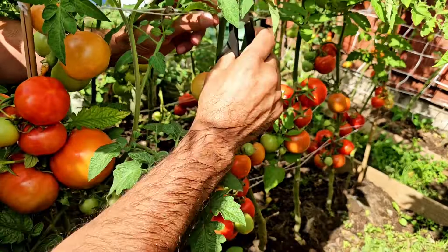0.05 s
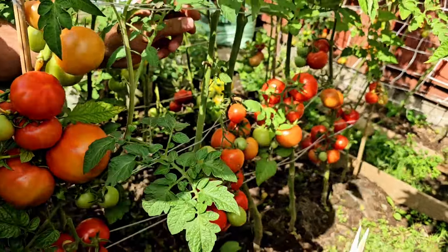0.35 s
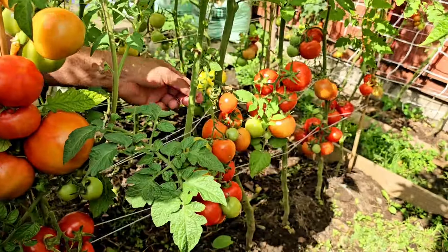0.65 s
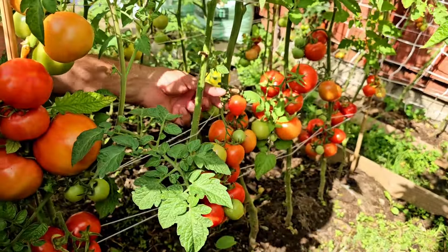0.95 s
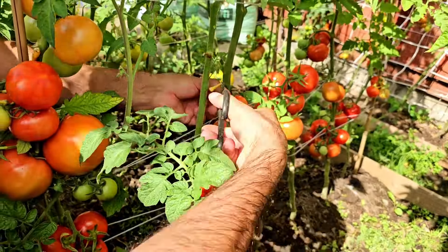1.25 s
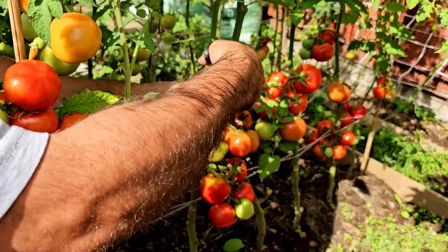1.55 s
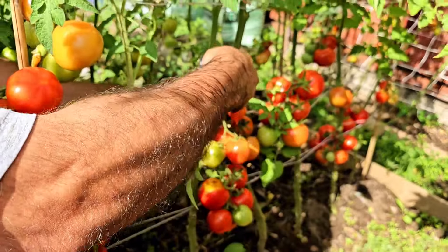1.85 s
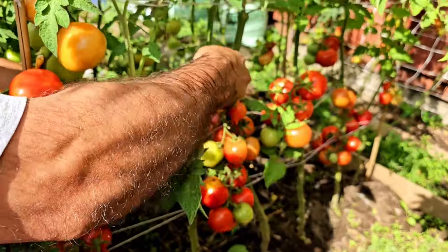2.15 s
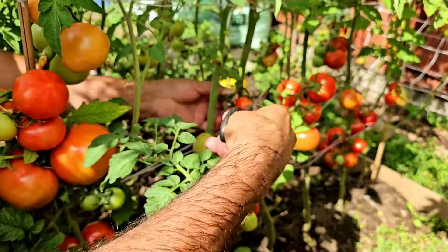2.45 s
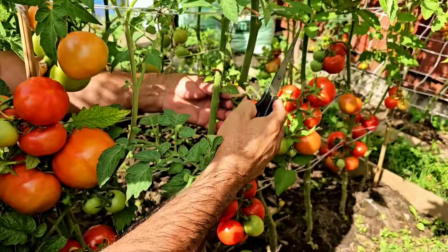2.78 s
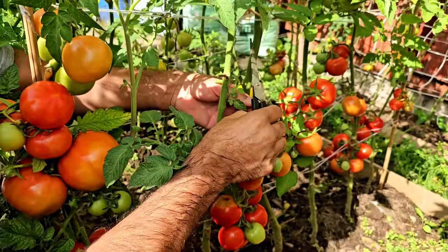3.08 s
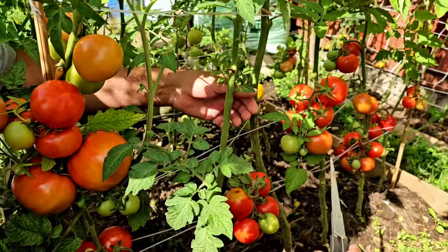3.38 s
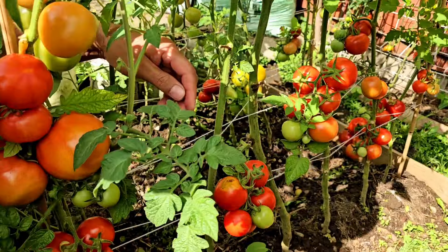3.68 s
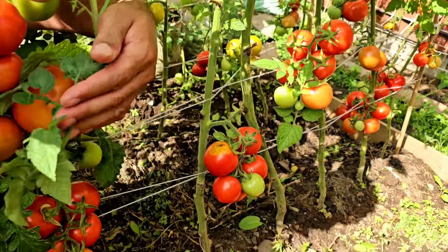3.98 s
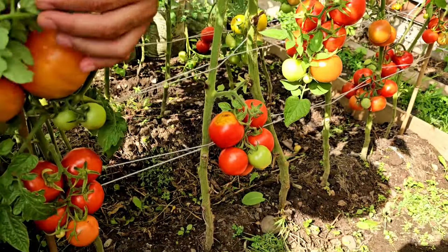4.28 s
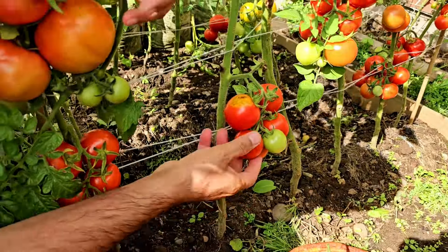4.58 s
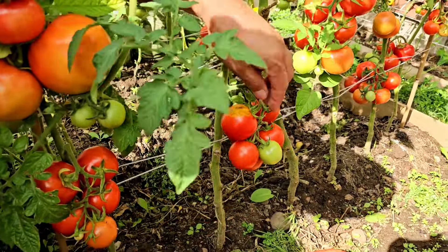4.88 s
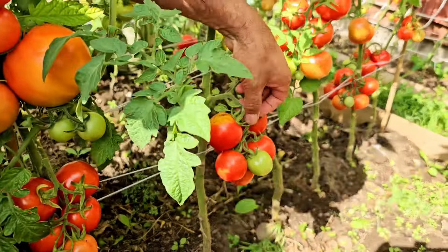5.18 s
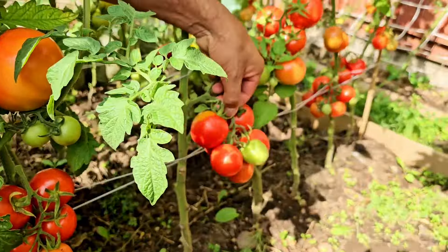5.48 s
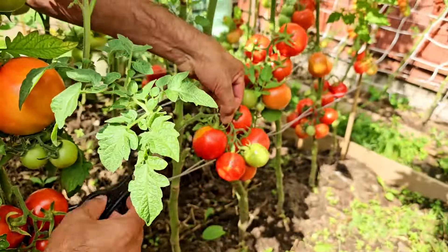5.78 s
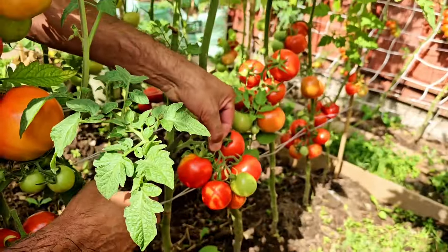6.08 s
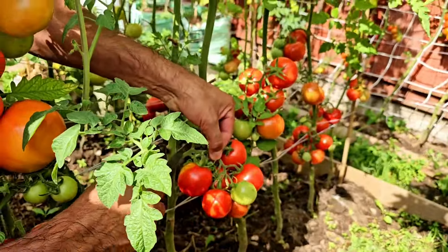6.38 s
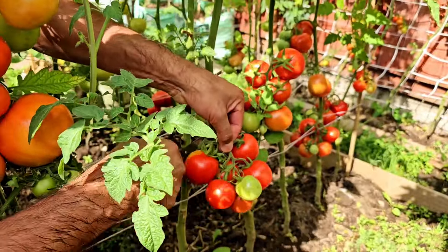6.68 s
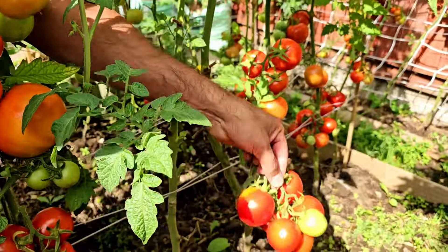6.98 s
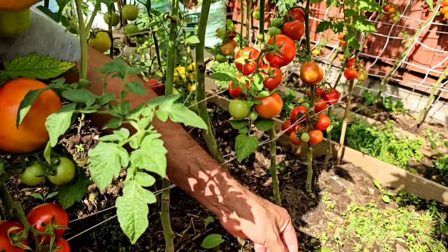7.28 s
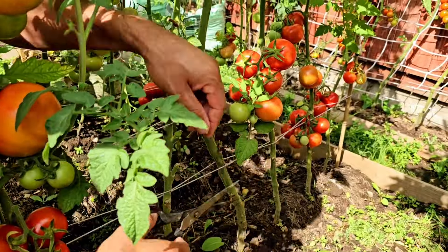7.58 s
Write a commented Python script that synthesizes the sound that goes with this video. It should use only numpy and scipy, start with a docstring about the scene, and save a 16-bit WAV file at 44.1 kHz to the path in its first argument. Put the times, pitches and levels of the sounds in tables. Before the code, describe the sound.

A low, uneven hum in a garden while hands bump and rustle tomato plants and scissors snap shut a few times.

```python
"""A garden: tomatoes are trimmed with scissors, close to two microphone ports.
A low hum swells and wavers over the soft outdoor rumble. Leaves brush the arms, their hairs
catching and slipping; hand and fruit bump the stalks, which crackle as fibres break.
Now and then the steel blades snap shut on a stem and ring."""
import sys
import numpy as np
from scipy import signal
from scipy.fft import rfft, irfft, next_fast_len
from scipy.io import wavfile
from scipy.ndimage import uniform_filter1d, map_coordinates

SR = 44100
rng = np.random.default_rng(int(sys.argv[2]) if len(sys.argv) > 2 else 0)


def materialize(psi):
    """Save the field psi as 16-bit PCM at rate SR to the path in sys.argv[1].

    A 1-D psi becomes a single channel; in a 2-D psi each row is a channel.
    """
    bounded = np.clip(np.atleast_2d(psi).T, -1, 1)
    quanta = np.round(bounded * 32767).astype(np.int16)
    wavfile.write(sys.argv[1], SR, quanta)


N = 345739

# Table levels are relative; each source adds its own gain.
# outdoor rumble spectrum: f/Hz, level/dB
AIR_SPECTRUM = [(20, -2), (35, -4.5), (60, -2), (100, 6.5), (140, 2.5), (180, -7.5), (250, -8), (310, -19),
                (520, -18.5), (750, -21.5), (1000, -28), (1400, -28.5), (2200, -42), (3500, -45.5),
                (16000, -62.5)]
# likeness of the ports in open air: f/Hz, coherence
AIR_COHERENCE = [(25, 0.47), (60, 1), (130, 0.93), (290, 0.87), (640, 0.21), (1300, -0.4), (3000, 0.18),
                 (15000, 0)]
# distant noise swells: middle t/s, length/s, level/dB, centre f/Hz, width/Hz
DISTANT_SWELLS = [(1.85, 0.41, -80, 1510, 400), (7.306, 0.45, -68.5, 694, 354)]
# air puffs at the ports: middle t/s, length/s, level/dB
AIR_PUFFS = [(0.25, 1.2, -53.5), (1.02, 0.33, -52.5), (1.42, 0.41, -46.5), (4.1, 0.18, -56),
             (4.88, 0.22, -56), (6.3, 3.8, -61.5)]
# puff spectrum: f/Hz, level/dB
PUFF_SPECTRUM = [(15, -14), (35, -2), (65, -1), (100, 2), (200, -14.5), (400, -33.5), (2000, -81.5)]
# hum swells: middle t/s, length/s, level/dB, crest f/Hz
HUM_SWELLS = [(0.225, 0.4, -42.5, 119.1), (0.484, 0.3, -38, 117.9), (1.18, 0.553, -46, 118),
              (1.695, 0.15, -45, 115.6), (2.565, 0.544, -32, 119.6), (3.285, 0.11, -41.5, 117),
              (3.53, 0.2, -38, 120.2), (3.774, 0.46, -32.5, 117), (4.565, 0.16, -48, 113),
              (4.767, 0.18, -46, 116.8), (5.444, 0.22, -45.5, 115.9), (5.743, 0.22, -43, 117.5),
              (6.025, 0.12, -47.5, 113.5), (6.26, 0.14, -43, 118.1), (6.469, 0.21, -40, 119.1),
              (6.944, 0.36, -40, 116), (7.254, 0.33, -42.5, 114.1), (7.702, 0.37, -43, 116.5)]
# leaves sliding on skin: middle t/s, length/s, swish level/dB, fizz re swish/dB
LEAF_STROKES = [(0.088, 0.18, -74.5, -5), (0.376, 0.16, -69, -2), (1.307, 0.19, -79, -7),
                (1.516, 0.077, -78, -5), (1.73, 0.025, -74, 4), (1.83, 0.057, -79.5, -10),
                (2.303, 0.046, -56.5, -3.5), (2.41, 0.27, -73.5, -0.5), (2.664, 0.046, -71, -4),
                (2.803, 0.16, -71.5, -1), (2.95, 0.14, -76.5, 2), (3.278, 0.12, -71.5, -2.5),
                (3.528, 0.1, -65, 2), (3.844, 0.24, -66.5, 0), (4.157, 0.18, -65, 2), (4.335, 0.2, -67, 1),
                (4.517, 0.14, -66.5, 2), (4.729, 0.51, -72, 1), (5.08, 0.12, -65.5, -5),
                (5.24, 0.17, -66.5, 4), (5.384, 0.24, -66.5, 0), (5.602, 0.086, -66, -6),
                (6.041, 0.14, -65.5, -7.5), (6.129, 0.043, -70.5, 9), (6.34, 0.035, -74.5, -1),
                (6.607, 0.14, -76, -22), (6.915, 0.092, -74, -1.5), (7.088, 0.12, -70.5, -3),
                (7.35, 0.16, -67, -8), (7.54, 0.23, -72, -6.5), (7.66, 0.12, -63, -8.5)]
# leaf friction spectra: f/Hz, level/dB
SWISH_SPECTRUM = [(500, -22.5), (1300, -7.5), (2000, -0.5), (3000, -1), (4200, 2), (5500, -1), (7500, 1),
                  (9000, -1.5), (10500, -17.5), (12000, -37.5)]
FIZZ_SPECTRUM = [(7000, -29.5), (9500, -19), (10700, -8), (11600, 0), (12500, -7), (14000, -4), (15400, -8),
                 (16000, -16.5)]
# single leaves scraping: middle t/s, level/dB, sigma/ms, centre f/Hz, width/Hz
LEAF_SCRAPES = [(0.186, -72, 20, 2180, 1000), (.35, -73.5, 41, 3980, 500), (1.1, -76.5, 9.7, 3800, 400),
                (2.43, -73.5, 22, 4450, 1200), (3.291, -74, 18, 6014, 1500), (4.16, -78.5, 100, 1970, 1470),
                (4.391, -79, 32, 4400, 900), (4.69, -72, 22, 4630, 1187), (5.33, -68.5, 81, 2000, 2270),
                (6.08, -73, 73, 2510, 2400), (6.12, -70.5, 25, 4368, 1226), (6.53, -79, 49, 3950, 907.6),
                (6.57, -66, 6, 4664, 600), (7.339, -60, 8.2, 1380, 600.5), (7.38, -71.5, 25, 4032, 893),
                (7.621, -75.5, 190, 2240, 2010)]
# bumps on a stalk; stiff stems ringing: t/s, level/dB, f/Hz, decay/ms
STALK_BUMPS = [(0.999, -38.5, 228.3, 8.4), (1.451, -47, 151, 14.1), (1.5, -46.5, 272, 23),
               (1.57, -43, 214.1, 9.4), (4.09, -39, 188, 24), (5.355, -34.5, 212.2, 12.2),
               (5.421, -26.5, 248, 2.3), (5.484, -44, 230, 28), (5.538, -45, 229.2, 27.7),
               (5.607, -27, 260.1, 2.55), (5.82, -37.5, 264, 6.7), (6.648, -47, 248.3, 6.7),
               (6.723, -61, 360, 6)]
STEM_TONES = [(0.914, -46, 910, 2.3), (1.011, -46.5, 1370, 2.4), (5.708, -28, 2000, 0.99)]
# stalks cracking; scissors closing on a stem or clicking open: t/s, level/dB, decay/ms, body/dB, crispness/dB,
# left re right/dB, right lag/ms
STALK_CRACKS = [(0.0387, -63.5, 4.5, -12, 5, 8, 0), (0.1702, -63, 2.5, 26.5, -24, -2, 0),
                (0.7243, -65, 1.4, 17, -8, 8, 0.17), (0.9157, -56, 1.5, 17.5, -22, 3.5, 0.08),
                (1.0034, -65, 2.7, 15, -12, 7, 0), (1.0123, -59, 1.6, 18, -1, -1, 0.2),
                (2.0233, -61, 3, 13.5, -13, 3, 0.35), (2.0529, -69.5, 4.9, 11, -7, 2, 0.35),
                (3.599, -63.5, 1.65, 26, -17, -12, 0.039), (3.8059, -56, 2.1, 18, 18, 4, 0.11),
                (4.3667, -61.5, 1.7, -57, -10, 2, 0), (4.4849, -58, 5, -11, 8, 12, 0.2),
                (4.9355, -59, 0.57, 3, -9, 11, 0.017), (5.4224, -61, 1.2, 23, -14, 14, 0.008),
                (5.477, -58, 3.6, 21.5, -24, 2, 0.56), (5.5917, -60.5, 1.2, 0, 1, 0, 0.12),
                (5.6283, -53.5, 8.2, 12, 1.5, -15, -0.24), (5.671, -53, 15, 16.5, -6, -17, -0.66),
                (5.709, -49, 0.53, 24, 1, 1, 0.561), (5.717, -57, 6.7, 9, -7, -2, 0.28),
                (5.7876, -44, 1.1, -24, -1.5, -6.5, -0.16), (5.7966, -48, 1.82, 4, -1.5, 1, -0.25),
                (5.8229, -49, 7.7, 10, -11, -14, 0.14), (5.9087, -51.5, 4.5, 14.5, -20, -23, -0.65),
                (6.616, -62.5, 6, 25, -2, 1, 0.4), (7.1714, -62.5, 2.17, 29, -20, 0, -0.34),
                (7.1951, -69.5, 3.2, -17, -21.5, 11, 0), (7.3389, -55, 10, -15, -10, 4, -0.085)]
SCISSOR_SNIPS = [(2.1873, -29, 2.14, -1.5, 2, 1.2, 0.19), (2.2893, -38, 0.91, -7, 5.5, 4.6, 0.17),
                 (6.7226, -19, 0.95, -5.5, 6.5, 4.6, -0.39)]
# crack and snip spectra: f/Hz, level/dB
STALK_SPECTRUM = [(100, -14.5), (400, -2.5), (900, -6), (1400, -3.5), (2000, 0), (2800, 1.5), (4500, 2),
                  (7500, -2), (10000, -8.5), (11600, 6.5), (14000, -4.5), (16000, -5)]
STEEL_SPECTRUM = [(100, -1), (500, 6), (900, -2), (1400, 4), (1900, -2.5), (2500, -1), (3200, -1.5),
                  (5200, 0.5), (6500, 2.5), (8000, 6), (10400, -3.5), (11500, -0.5), (14500, 1),
                  (16000, -18.5)]
# blade resonances: f/Hz, width/Hz, level/dB
BLADE_MODES = [(3030, 53, 1), (4220, 620, -1), (5000, 160, -16.5), (5600, 170, -3.5), (6960, 180, -4.5),
               (8290, 290, 0), (9770, 200, -12.5), (11510, 460, 4), (13540, 180, 5.5), (15400, 400, -6)]


def amp(db):
    """Decibels to gain."""
    return 10 ** (np.asarray(db) / 20)


def unit(x):
    """Scale to rms 1."""
    return x / np.sqrt(np.mean(x ** 2) + 1e-20)


def curve_at(points, hz):
    """Interpolate on a log-frequency axis."""
    point_hz, value = np.transpose(points)
    return np.interp(np.log(hz + 1), np.log(point_hz + 1), value)


def shaped(x, spectrum):
    """Filter by a spectrum; rms 1."""
    size = next_fast_len(N)
    gain = amp(curve_at(spectrum, np.fft.rfftfreq(size, 1 / SR)))
    return unit(irfft(rfft(x, size) * gain, size)[..., :N])


def band_noise(centre_hz, width_hz, size):
    """One noise band, independent in each port."""
    hz = np.fft.rfftfreq(size, 1 / SR)
    white = rfft(rng.standard_normal((2, size)))
    return irfft(white / (1 + (2 * (hz - centre_hz) / width_hz) ** 2), size)


def wander(rate_hz):
    """Random drift, rms 1."""
    knots = rng.standard_normal(4096)
    return unit(map_coordinates(knots, [np.arange(N) / SR * rate_hz], order=1, mode="wrap"))


def pan(left_db):
    """Port gains for a left-right difference."""
    return amp([[left_db / 2], [-left_db / 2]])


def control_times():
    """Time grid of the slow controls, in s."""
    return np.linspace(0, N / SR, num=4000)


def upsample(control):
    """Slow control to audio rate."""
    return np.interp(np.arange(N) / SR, control_times(), control)


def arch(middle_s, length_s, edge=2):
    """Gain peak, 1/e at half a length; edge 2 is a bell, lower is sharper with longer skirts."""
    return np.exp(-np.minimum(abs(2 * (control_times() - middle_s) / length_s) ** edge, 30))


def swelling(rows, rest_db, edge=2):
    """Power sum of arches over a resting level."""
    power = sum((amp(db) * arch(t_s, length_s, edge)) ** 2 for t_s, length_s, db, *_ in rows)
    return np.sqrt(amp(rest_db) ** 2 + power)


def air(level_db=-50, drift_db=0.31):
    """Distant outdoor rumble, alike in both ports only in the bass."""
    size = next_fast_len(N)
    left, other = rfft(rng.standard_normal((2, size)))
    coherence = np.clip(curve_at(AIR_COHERENCE, np.fft.rfftfreq(size, 1 / SR)), -1, 1)
    right = coherence * left + np.sqrt(1 - coherence ** 2) * other
    pair = irfft(np.array([left, right]), size)[:, :N]
    return pan(left_db=0.3) * amp(level_db + drift_db * wander(5)) * shaped(pair, AIR_SPECTRUM)


def distant_swells():
    """Bands of outdoor noise rise and sink."""
    out = np.zeros((2, N))
    for t_s, length_s, db, centre_hz, width_hz in DISTANT_SWELLS:
        band = band_noise(centre_hz, width_hz, next_fast_len(N))[:, :N]
        out += amp(db) * upsample(arch(t_s, length_s)) * unit(band)
    return out


def puffs():
    """Air moving nearby: a dull rumble common to both ports."""
    level = upsample(swelling(AIR_PUFFS, rest_db=-69))
    return pan(left_db=1) * level * shaped(rng.standard_normal(N), PUFF_SPECTRUM)


def hum(gain_db=0.08, rest_hz=115, sag_hz_per_db=0.31, flutter_hz=0.35, octave_db=-26, waver=0.016):
    """Near-pure drone with a faint octave; goes flat as each swell fades."""
    level = swelling(HUM_SWELLS, rest_db=-59)
    pitch_hz = rest_hz
    for t_s, length_s, db, crest_hz in HUM_SWELLS:
        share = (amp(db) * arch(t_s, length_s) / level) ** 2
        sag_hz = sag_hz_per_db * (db - 20 * np.log10(level))
        pitch_hz = pitch_hz + share * (crest_hz - rest_hz - sag_hz)
    phase = 2 * np.pi * np.cumsum(upsample(pitch_hz) + flutter_hz * wander(8)) / SR
    tone = np.sin(phase) + amp(octave_db + 2 * wander(7)) * np.sin(2 * phase)
    return pan(left_db=0.94) * amp(gain_db) * upsample(level) * unit(tone) * (1 + waver * wander(19))


def stroke_levels(edge=1.2):
    """Swish and fizz envelopes; foliage stirs faintly between strokes."""
    fizz_rows = [(t_s, length_s, db + fizz_db) for t_s, length_s, db, fizz_db in LEAF_STROKES]
    swish = swelling(LEAF_STROKES, rest_db=-87, edge=edge)
    fizz = swelling(fizz_rows, rest_db=-89, edge=edge)
    return upsample(swish), upsample(fizz)


def leaf_resonances(x, slow_db=2.0, quick_db=2.5, size=512):
    """Passing resonances of each leaf: patches of colour come and go."""
    frames = signal.stft(x, nperseg=size)[2]
    slow, quick = rng.standard_normal((2,) + frames.shape[1:])
    slow = uniform_filter1d(uniform_filter1d(slow, size=11, axis=0), size=12, axis=1)
    quick = uniform_filter1d(quick, size=26, axis=0)
    patches = amp(slow_db * unit(slow) + quick_db * unit(quick))
    return signal.istft(frames * unit(patches), nperseg=size)[1][:, :N]


def leaves(swish, fizz, grains_per_s=380, spread_db=-2.0, hiss=0.9, flutter_db=2.0):
    """Leaf hairs catch and slip: dense tiny ticks in a fluttering hiss."""
    sizes = amp(spread_db * np.minimum(rng.exponential(1, (3, N)), 4)) * rng.choice([-1, 1], (3, N))
    grains = unit(sizes * (rng.random((3, N)) < grains_per_s / SR))
    slips = grains + hiss * rng.standard_normal((3, N))
    direct = np.array([slips[0], np.roll(slips[0], 8)])  # left port first
    scattered = slips[1:]
    pair = leaf_resonances(direct + scattered)
    friction = swish * shaped(pair, SWISH_SPECTRUM) + fizz * shaped(pair, FIZZ_SPECTRUM)
    return pan(left_db=3.5) * amp(flutter_db * wander(60)) * friction


def scrapes(gain_db=-1, rough_db=5.0, size=16384):
    """A leaf drags over a finger: one rough band swells and fades."""
    out = np.zeros((2, N + 2 * size))
    t_ms = (np.arange(size) - size // 2) / SR * 1000
    for t_s, db, sigma_ms, centre_hz, width_hz in LEAF_SCRAPES:
        band = unit(band_noise(centre_hz, width_hz, size))
        start = round(t_s * SR) + size // 2
        out[:, start:start + size] += amp(db) * band * np.exp(-(t_ms / sigma_ms) ** 2 / 2)
    return pan(left_db=3) * amp(gain_db + rough_db * wander(250)) * out[:, size:size + N]


def knocks(rows, gain_db, attack_ms, size=8192):
    """A pushed stalk rings briefly; soft flesh slows the attack."""
    out = np.zeros(N + size)
    t_ms = np.arange(size) / SR * 1000
    attack = 1 - np.exp(-t_ms / attack_ms)
    for t_s, db, hz, decay_ms in rows:
        ring = np.sin(2 * np.pi * hz * t_ms / 1000) * np.exp(-t_ms / decay_ms)
        start = round(t_s * SR)
        out[start:start + size] += amp(db) * ring * attack
    return amp(gain_db) * out[:N]


def fibre_breaks(rows, spectrum, rise_ratio, grit_db, modes=(), ring_db=0, size=4096):
    """Quick runs of breaks build and die, coloured by what they shake."""
    out = np.zeros((2, N + 2 * size))
    t_ms = (np.arange(size) - size // 4) / SR * 1000
    hz = np.fft.rfftfreq(size, 1 / SR)
    resonance = sum(amp(db) / (1 + 2j * (hz - mode_hz) / width_hz) for mode_hz, width_hz, db in modes)
    ring = 1 + amp(ring_db) * resonance
    for t_s, db, decay_ms, body_db, crisp_db, left_db, lag_ms in rows:
        noise, clumps = rng.standard_normal((2, size))
        envelope = np.exp(-np.maximum(t_ms / decay_ms, -t_ms / (rise_ratio * decay_ms)))
        run = rfft(noise * amp(grit_db * clumps) * envelope)
        run /= np.sqrt(uniform_filter1d(abs(run) ** 2, size=84) + 1e-12)  # breaks are broadband
        tilt_db = curve_at([(1100, body_db), (3200, 0.0036), (9000, 0.00077), (12800, crisp_db)], hz)
        run *= amp(curve_at(spectrum, hz) + tilt_db) * ring
        delayed = run * np.exp(-2j * np.pi * hz * lag_ms / 1000)
        pair = irfft(np.array([run, delayed])) * pan(left_db)
        start = round(t_s * SR) + size - size // 4
        out[:, start:start + size] += amp(db) * unit(pair) * np.sqrt(.01 * SR / size)  # level over 10 ms
    return out[:, size:size + N]


def leaf_ticks(swish, per_s=12, above_db=3, spread_db=2.5, colour_db=6, decay_ms=1.6, lag_ms=0.13):
    """Random ticks of leaf edges, level following the swish; rows as in STALK_CRACKS."""
    draws = rng.uniform(-1, 1, (200, 5))[:int(per_s * N / SR)]
    rows = []
    for when, strength, body, crisp, side in draws:
        at = int((when + 1) / 2 * N)
        db = 20 * np.log10(swish[at]) + above_db + spread_db * strength
        rows.append((at / SR, db, decay_ms, -9 + colour_db * body, colour_db * crisp, 4 + 4 * side, lag_ms))
    return rows


def stalks(swish, gain_db=2.6):
    """Stalks crack, leaf edges tick, stiff stems ring."""
    cracks = fibre_breaks(STALK_CRACKS + leaf_ticks(swish), STALK_SPECTRUM, rise_ratio=1.0, grit_db=8.7)
    return amp(gain_db) * cracks + knocks(STEM_TONES, gain_db=-3.5, attack_ms=0.43)


def scissors(gain_db=0.14):
    """Blades shut on a stem or click open; the steel rings."""
    return amp(gain_db) * fibre_breaks(SCISSOR_SNIPS, STEEL_SPECTRUM, rise_ratio=0.93, grit_db=4.8,
                                       modes=BLADE_MODES, ring_db=0.5)


def garden_scatter(x, near_db=-10, near_t60_s=0.04, far_db=-21, far_t60_s=0.1, size=8192):
    """Add short scatter from arms and fruit, fainter scatter from soil and plants."""
    t_s = np.arange(size) / SR
    near, far = rng.standard_normal((2, 2, size)) * (t_s > .0007)
    far = signal.lfilter([1], [1, -.3], far)  # leaves absorb treble
    tail = amp(near_db) * unit(near * amp(-60 * t_s / near_t60_s))
    tail += amp(far_db) * unit(far * amp(-60 * t_s / far_t60_s))
    return x + signal.oaconvolve(x, tail / np.sqrt(size), axes=1)[:, :N]


def scene():
    """Hum and air behind the work of the hands."""
    swish, fizz = stroke_levels()
    cutting = stalks(swish) + scissors()
    bumps = knocks(STALK_BUMPS, gain_db=-2, attack_ms=1.5)
    background = hum() + air() + distant_swells() + puffs()
    return background + leaves(swish, fizz) + scrapes() + bumps + garden_scatter(cutting)


def record(dry, ceiling=0.75, cutoff_hz=15900):
    """Soft clip, then low-pass."""
    rounded = ceiling * np.tanh(dry / ceiling)
    lowpass = signal.firwin(255, cutoff_hz, window=("kaiser", 9), fs=SR)
    return signal.oaconvolve(rounded, lowpass[None], "same")


dry = scene()
out = record(dry)
materialize(out)
```